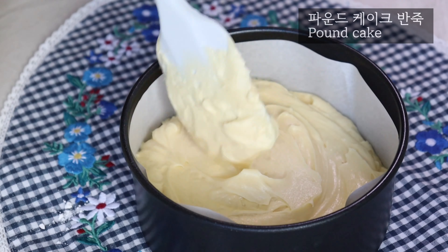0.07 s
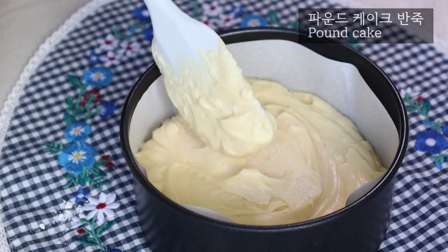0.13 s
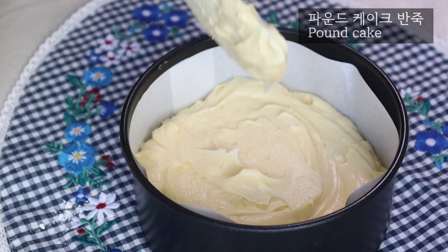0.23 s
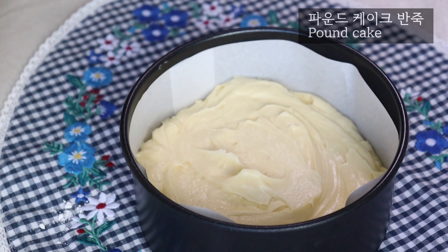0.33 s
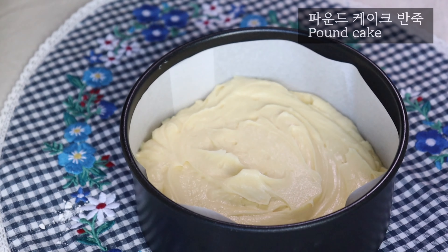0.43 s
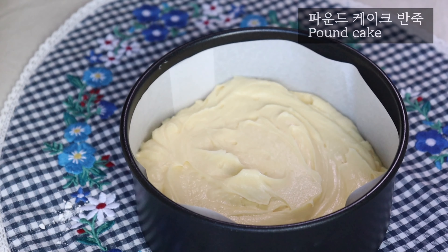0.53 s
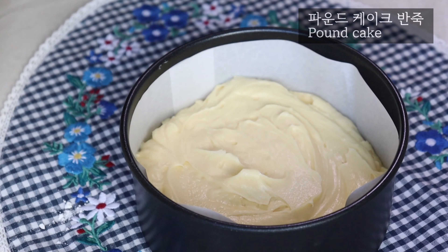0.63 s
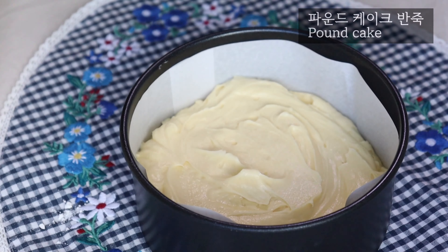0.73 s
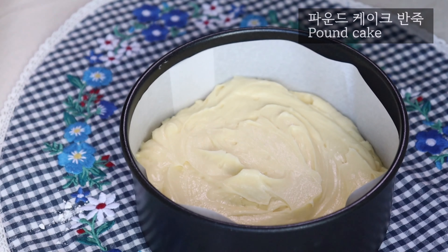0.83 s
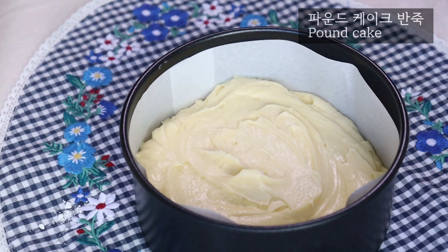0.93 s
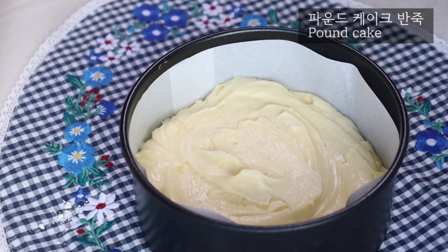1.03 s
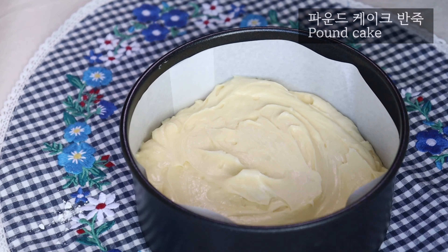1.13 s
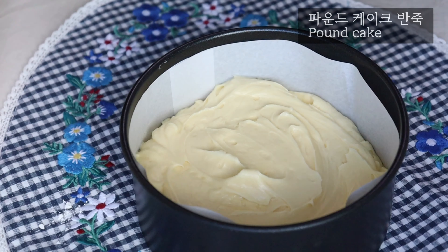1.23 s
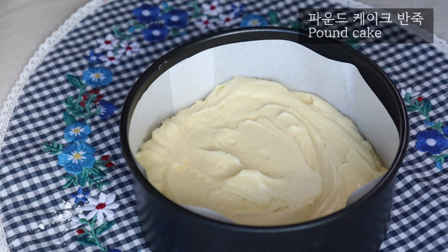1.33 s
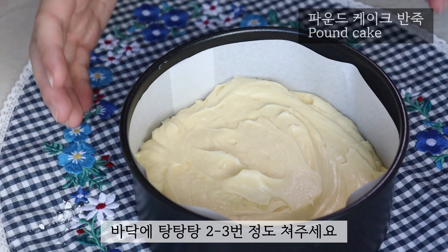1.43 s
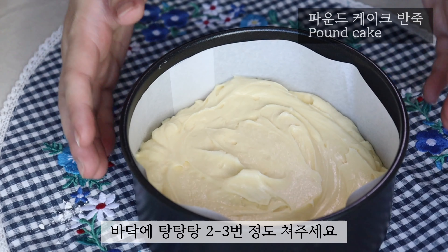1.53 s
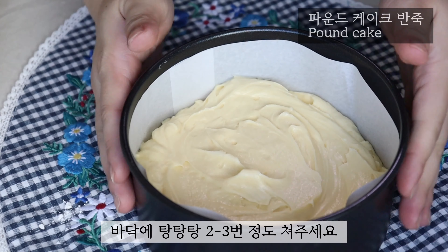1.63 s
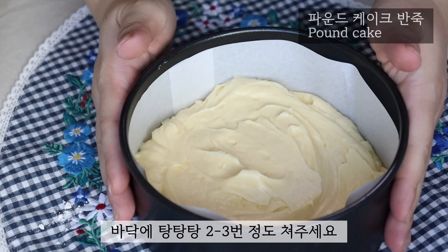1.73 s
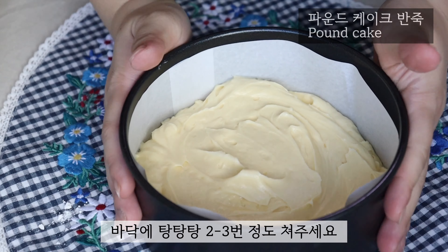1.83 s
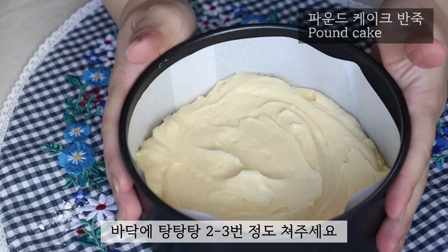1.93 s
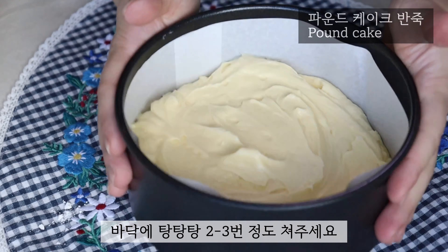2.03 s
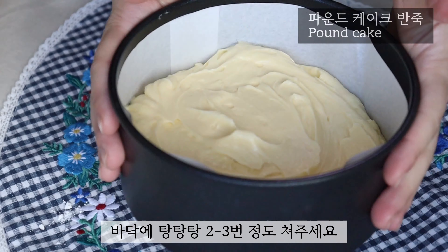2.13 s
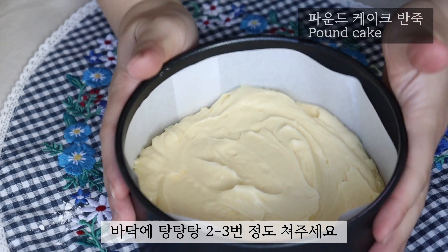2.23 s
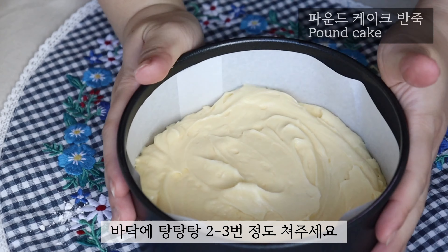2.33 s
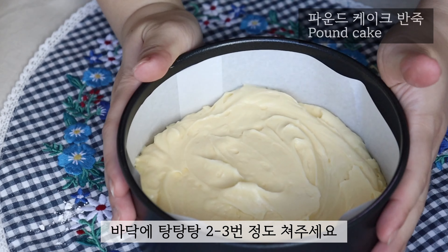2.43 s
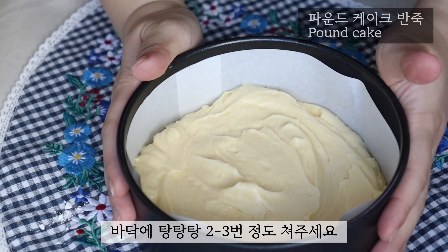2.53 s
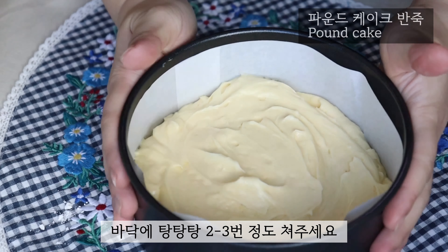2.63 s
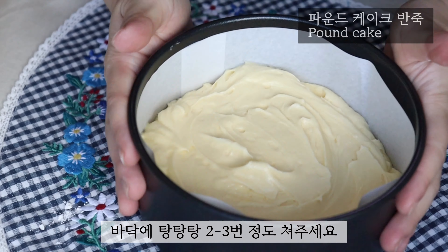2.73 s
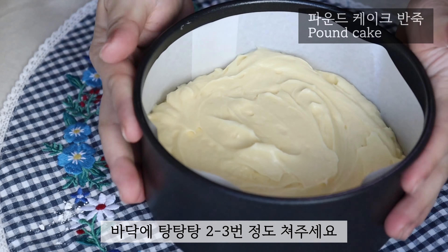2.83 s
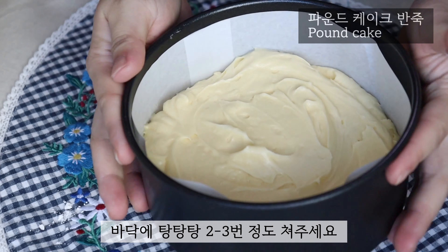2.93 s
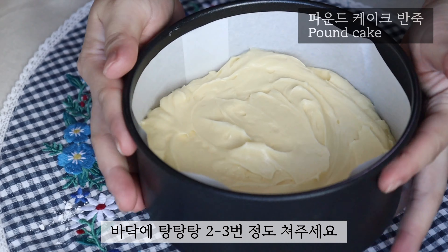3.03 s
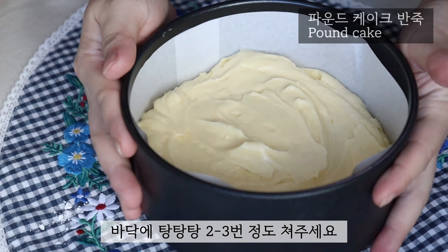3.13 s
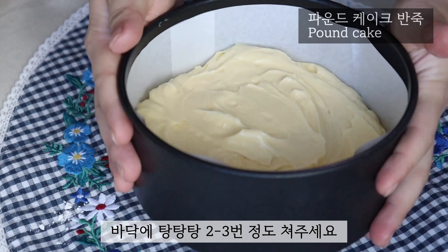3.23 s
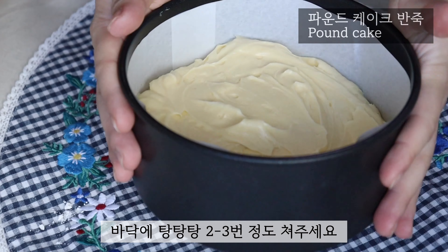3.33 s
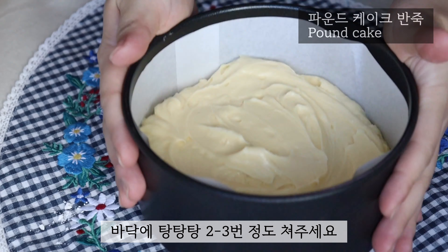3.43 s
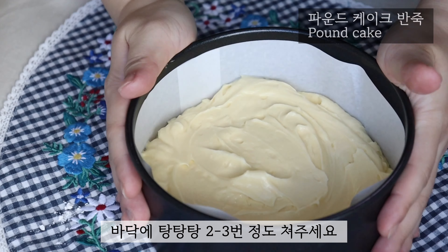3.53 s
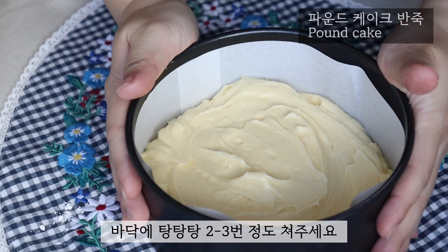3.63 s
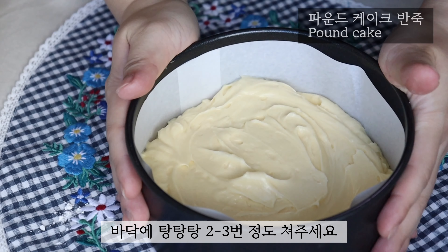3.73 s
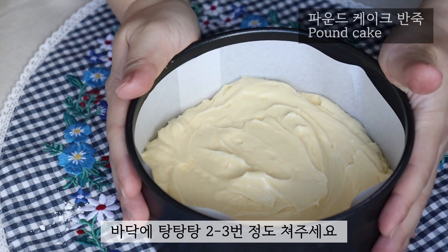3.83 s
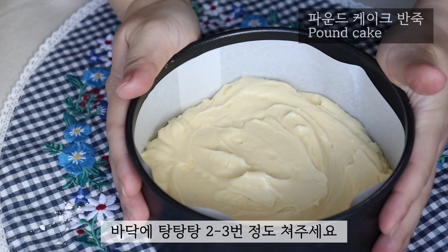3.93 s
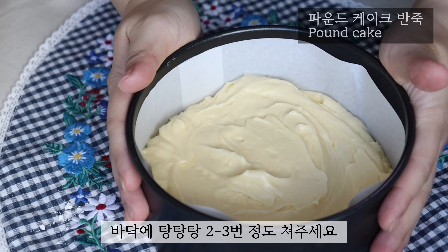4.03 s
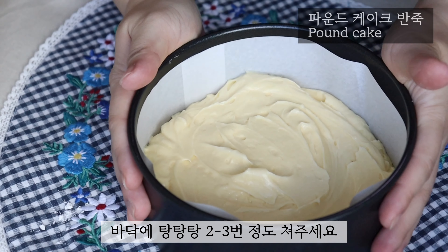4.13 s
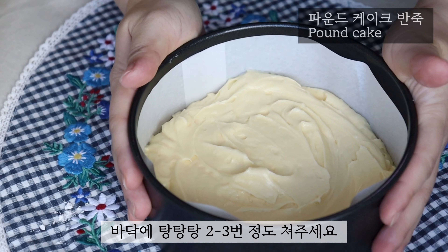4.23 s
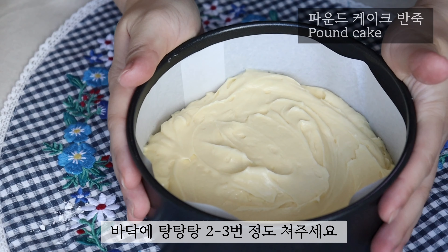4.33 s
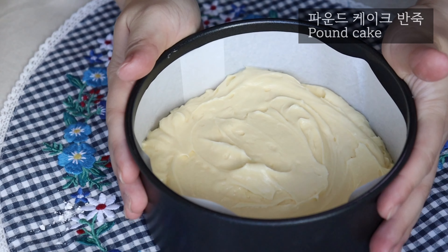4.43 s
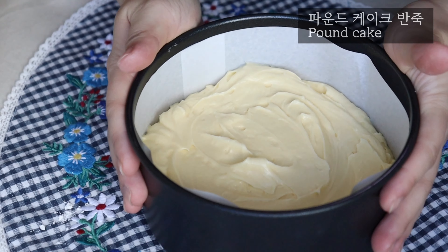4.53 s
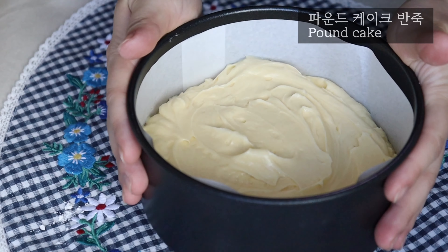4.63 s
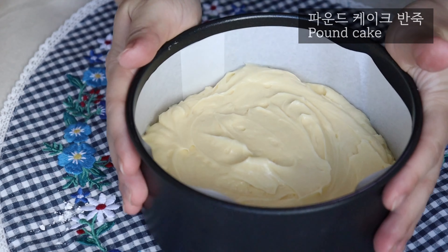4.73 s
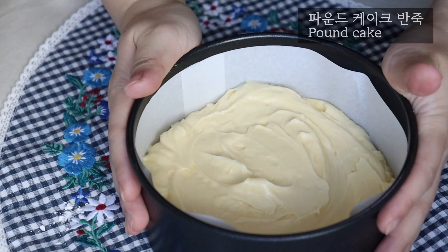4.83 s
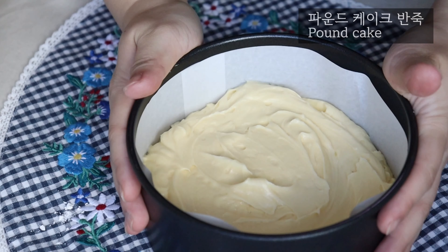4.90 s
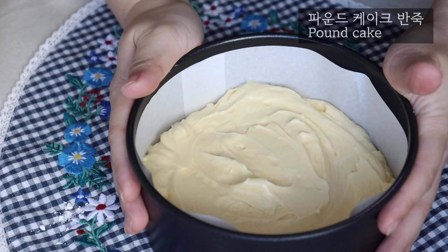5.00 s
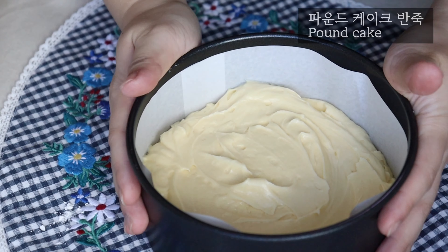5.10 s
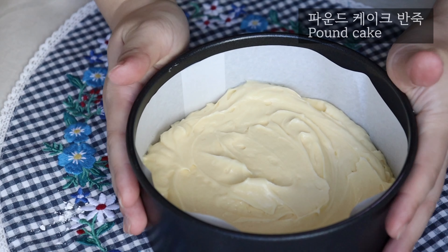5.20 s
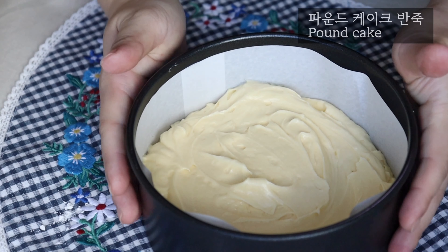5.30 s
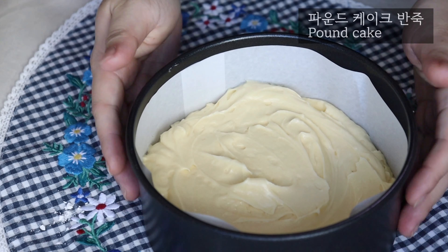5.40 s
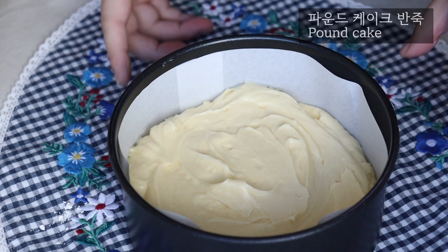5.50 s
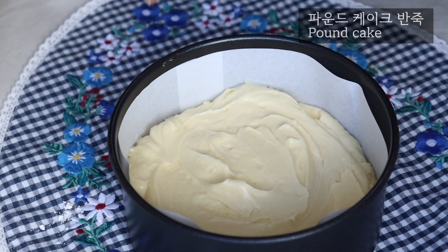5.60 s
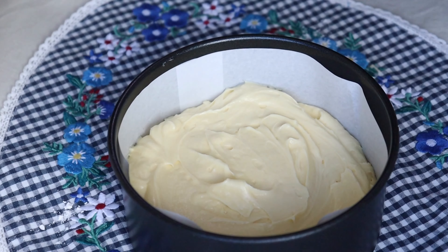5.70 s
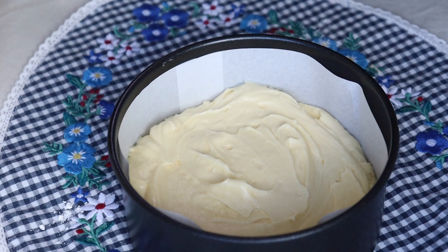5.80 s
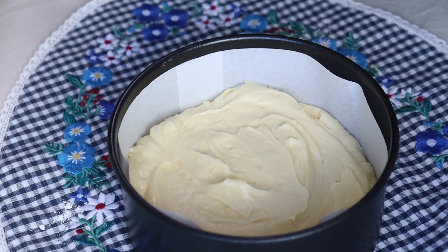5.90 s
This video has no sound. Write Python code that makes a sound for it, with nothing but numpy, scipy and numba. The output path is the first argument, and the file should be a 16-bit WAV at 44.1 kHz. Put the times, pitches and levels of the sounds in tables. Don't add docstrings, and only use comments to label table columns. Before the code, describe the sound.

Over a steady kitchen hum and faint insect chirps, three heavy pan thumps hit a table, rattling loose metal that chatters briefly.

```python
import sys
import numpy as np
from scipy import signal
from scipy.fft import rfft, irfft, next_fast_len
from scipy.io import wavfile
from scipy.ndimage import uniform_filter1d, map_coordinates
from numba import njit

SR = 44100
rng = np.random.default_rng(int(sys.argv[2]) if len(sys.argv) > 2 else 0)


def field_ratio(decibels):
    return 10 ** (np.asarray(decibels, dtype=float) / 20)


def master_out(mix):
    frames = np.transpose(np.atleast_2d(mix))
    ceiling = np.clip(frames, -1, 1)
    pcm = np.round(ceiling * 32767).astype(np.int16)
    wavfile.write(sys.argv[1], SR, pcm)


N = 262836

# frequency in Hz, level in dB, unsteady share from 0 to 1.
FRIDGE_LINES = [(28, -61, 0.1), (50.35, -36, 0.31), (57.4, -45.5, 0.6), (71, -57.5, 0.3), (123.5, -70.5, 1),
                (122, -49, 0), (220.8, -53, 0.91), (250, -56.5, 0.1), (365, -54.5, 0.92),
                (403, -58.5, 0.44)]
# frequency in Hz, density in dB per Hz.
AIR_SPECTRUM = [(15, -39), (25, -43), (63, -36), (97, -10), (170, -14.5), (229, -14.5), (293, -19),
                (363, -12), (575, -21), (1330, -25.5), (3250, -37.5), (7110, -42), (14800, -49.5),
                (16500, -47)]
# frequency in Hz, width in Hz, level in dB.
FAR_HISS = [(1293, 14, -63), (2110, 64, -67.5), (4940, 750, -66.5), (2805, 210, -68)]
# start in seconds, level in dB.
INSECT_STROKES = [(.9165, -47), (0.9257, -36.5), (0.9288, -36), (0.933, -45), (.937, -39), (.944, -40),
                  (.953, -42), (.9585, -42), (.9615, -38), (.989, -50), (1.36, -47), (1.4205, -46),
                  (1.424, -43), (1.428, -33.5), (1.434, -44), (1.442, -48), (1.4485, -44), (1.457, -44),
                  (5.655, -55)]
# start in seconds, level in dB, frequency in Hz.
SMALL_TICKS = [
    (1.4275, -50, 10000),
    (1.4485, -56, 9800),
    (1.4485, -49, 4000),
    (2.843, -47, 3100),
    (2.886, -46, 3040),
    (2.949, -48, 3100),
    (3.007, -54, 3100),
    (3.05, -53, 3200),
]
# centre in seconds, length in seconds, level in dB,
# frequency in Hz, lower band in dB.
BRUSHES = [(0.134, 0.11, -63, 11000, 15), (.6, .06, -70, 10000, 5), (1.36, .06, -63, 10000, 11),
           (1.752, .22, -57.5, 10000, 9), (1.986, 0.12, -63.5, 9500, 11), (2.675, .05, -63, 11000, -5),
           (2.838, 0.055, -61, 10400, -3), (2.93, .05, -61, 11500, -8), (2.977, 0.091, -58.5, 9800, -10),
           (3.114, 0.1, -58, 10500, -6), (3.225, 0.063, -59, 8600, 3), (3.262, 0.059, -56, 10500, 3),
           (3.386, 0.16, -57.5, 8300, 9), (5.375, 0.29, -65, 9500, 13), (5.757, 0.25, -68, 9000, 16),
           (5.892, 0.1, -64, 10000, 13), (1.949, .4, -58.5, 2200, 3), (5.621, 0.49, -62, 2800, 2),
           (5.851, 0.57, -57.5, 2000, 3)]
# frequency in Hz, level in dB, T60 in seconds.
RIM_MODES = [(3482, -9, .4), (3621, -5, .65), (4753, -12, .4), (5578, 1, .42), (7881, -6, .38)]
# frequency in Hz, level in dB, T60 in seconds.
RACK_MODES = [(921, -3, .3), (1147, 0, .22), (1865, -6, .35), (2823, 4, .2), (3260, -14, .65),
              (4353, -10, .66), (9470, -12, .22), (10140, -10, .2)]
# start in seconds, level in dB.
RIM_STRIKES = [
    (2.369, -31),
    (3.612, -29),
]
# start in seconds, level in dB.
RACK_STRIKES = [
    (3.612, -24),
]
# start in seconds, level in dB, tilt in dB per octave,
# knock on the table in dB.
METAL_LANDINGS = [(2.3178, -12.5, -4, -11), (2.362, -10.5, -3.5, -28), (2.367, -9, 1, -33),
                  (2.381, -10.5, -0.1, -21), (2.406, -16, -0.8, -8.5), (2.438, -18.5, 0.5, -9),
                  (2.46, -19.5, -1.5, -21), (2.484, -23, -2.2, -10.5), (2.532, -36.5, -2, -39),
                  (3.5594, -17, -2.5, -2), (3.605, -14, -1.5, 0.5), (3.6089, -5, 1, -27),
                  (3.623, -5.5, 2.5, -17), (3.632, -16, -3, -23), (3.645, -10, -0.2, -30),
                  (3.68, -17.5, -1, -11), (3.705, -21.5, 0, -15.5), (3.725, -23, -2.5, -35),
                  (3.77, -30, -3.5, -32), (3.997, -39.5, -2.5, -42), (4.854, -19, -3.5, -4.5),
                  (4.8965, -4, 1, -12), (4.902, -7.5, -0.5, -13), (4.914, -18.5, 6, -14.5),
                  (4.93, -17.5, -2, -12), (4.966, -21, 0, -37), (5.004, -45, -4, -37),
                  (5.088, -33, -7.5, -38)]
# frequency in Hz, level in dB, T60 in seconds.
METAL_MODES = [(1200, -11.5, 0.024), (1194, -11, 0.075), (1893, -17, 0.031), (1977, -9.5, 0.056),
               (2837, -9, 0.053), (3100, -24, 0.23), (3570, -9, 0.071), (4120, -17, 0.06),
               (4560, -16, 0.039), (5540, -9, 0.031), (5580, -7.5, 0.036), (7950, -18, 0.1),
               (9500, -15, 0.018), (10200, -14, .03)]
# frequency in Hz, density in dB per Hz.
CLATTER_SPECTRUM = [(180, -4), (300, -8), (1150, -1.5), (1480, -15), (1870, 0), (2400, -8.5), (2790, -5.5),
                    (5610, -5.5), (7320, -15), (10400, -8.5), (16000, -22)]
# start in seconds, level in dB, frequency in Hz, T60 in seconds.
METAL_PINGS = [(2.2995, -25, 4000, .03), (2.369, -19, 5610, .12), (2.369, -20, 1170, .05),
               (2.405, -23, 5600, .1), (2.438, -28, 10100, .04), (3.611, -20, 2823, .12),
               (3.612, -20, 5620, .08), (3.622, -18, 10200, .045), (3.622, -21, 8010, .06),
               (4.9, -17, 1190, .05), (4.9, -15, 1970, .05), (4.9, -16, 4190, .05), (4.9, -15, 4670, .055),
               (4.922, -22, 3570, .08)]
# start in seconds, level in dB, frequency in Hz, T60 in seconds.
FAVOURED_MODES = [
    (2.3, -23, 200, 0.23),
    (2.412, -22, 61, 0.67),
    (3.555, -20, 362, 0.13),
    (3.59, -13, 358, 0.17),
    (3.579, -15, 222.5, 0.39),
    (3.666, -21, 64.2, 0.58),
    (4.858, -13, 200, 0.24),
    (4.88, -22, 206.6, 0.38),
]
# start in seconds, level in dB, push in ms,
# deep modes in dB, direction (+1 down, -1 up).
PAN_BLOWS = [(2.2964, 2, 1.7, -24, 1), (2.2994, -6.2, 1.06, -14, -1), (2.304, -16, 6.9, -3, 1),
             (2.329, -19, 3.7, -10, 1), (3.5428, -16, 3, 19.5, 1), (3.5463, 2, 3.1, -3.5, -1),
             (3.5529, -1, 2.36, 1.5, 1), (3.5592, -6, 1.9, -12, -1), (3.59, -22, 2.9, -6, 1),
             (4.8353, -3, 5.6, 2.5, 1), (4.839, -2.2, 4, 1.5, -1), (4.845, -2.5, 3.4, -0.5, 1),
             (4.86, 0.5, 5.3, -10, 1), (4.883, -21, 3.4, -10, 1)]
# frequency in Hz, level in dB, T60 in seconds.
TABLE_MODES = [(58.23, -12.5, 0.82), (77.6, -6, 0.13), (101, -3, 0.056), (142.6, -11, 0.35),
               (200, -5.5, 0.23), (243.4, -0.5, 0.077), (294.3, -13, 0.31), (342.1, -14, 0.22),
               (397.6, -9.5, 0.072), (495, -5.5, 0.042), (600, -41, .06), (686, -54, .15)]
# frequency in Hz, density in dB per Hz.
SLAP_SPECTRUM = [(180, -6.5), (300, -3), (470, -11), (1030, -18), (1870, -21), (4830, -33.5),
                 (13500, -49.5), (16000, -61)]

AIR_DB = -43
FAST_UNTIL_S, FAST_RATIO = .922, 1.2
INSECT_HZ, INSECT_SCATTER, INSECT_TRAIL_S = 5110, .014, .03
BRUSH_WIDTH = .35
DRAG_FROM_S, DRAG_TO_S, DRAG_DB, DRAG_EDGE_S = 2.56, 2.8, -41, 0.036
CHATTER_RATE_HZ, MODE_SCATTER_DB = 2000, 5.5
CHATTER_LEAST_S, CHATTER_SHARE, CHATTER_MOST_S = 0.0039, 0.68, 0.026
METAL_RING_DB, RING_DB_PER_TILT = -13, 1
SMALL_MODES, SMALL_T60_S, SMALL_SHARE = 110, .045, .25
SLAP_DB, SLAP_DB_PER_MS = -6.5, -3.5
ROOM_T60_S, ROOM_DB, ROOM_DULL_HZ = 0.38, -12.5, 5030
MIC_LOW_HZ, MIC_TOP_HZ, MIC_HISS_DB = 32, 15800, -68.5
GAIN_TOP_DB, GAIN_POWER, GAIN_ATTACK_S, GAIN_RELEASE_S = -24, 0.063, 0.019, 0.26


def shaped(points, count):
    hz, db = np.transpose(points)
    f = np.fft.rfftfreq(count, 1 / SR) + 1
    colour = field_ratio(np.interp(np.log(f), np.log(hz), db))
    x = irfft(rfft(rng.standard_normal(count)) * colour, count)
    return x / np.std(x)


def band(hz, width_hz, count):
    f = np.fft.rfftfreq(count, 1 / SR)
    resonance = 1 / (1 + ((f - hz) / (width_hz / 2)) ** 2)
    x = irfft(rfft(rng.standard_normal(count)) * resonance, count)
    return x / np.std(x)


def rings(modes, length_s):
    t = np.arange(int(length_s * SR)) / SR
    return np.array([field_ratio(db - 60 * t / t60) * np.sin(2 * np.pi * hz * t) for hz, db, t60 in modes])


def add(out, s, x):
    i = int(s * SR)
    out[i:i + len(x)] += x[:len(out) - i]


def kitchen():
    count = next_fast_len(N + SR // 2)
    t = np.arange(count) / SR
    out = field_ratio(AIR_DB + .4 * band(0, 1.5, count)) * shaped(AIR_SPECTRUM, count)
    for hz, db, unsteady in FRIDGE_LINES:
        line = np.sqrt(2) * np.sin(2 * np.pi * (hz * t + rng.random()))
        out += field_ratio(db) * (line + unsteady * band(hz, 7.3, count))
    for hz, width_hz, db in FAR_HISS:
        out += field_ratio(db + 2.0 * band(0, 13, count)) * band(hz, width_hz, count)
    n = np.arange(N)
    place = np.where(n < FAST_UNTIL_S * SR, n * FAST_RATIO, n + SR // 2)
    return map_coordinates(out, [place], order=3)


def insect():
    out, t = np.zeros(N), np.arange(SR // 10) / SR
    pitch = INSECT_HZ * (1 + INSECT_SCATTER * rng.standard_normal(len(INSECT_STROKES)))
    chirps = [(s, db, hz) for (s, db), hz in zip(INSECT_STROKES, pitch)]
    for s, db, hz in chirps + SMALL_TICKS:
        swell = t / .0008 * np.exp(1 - t / .0008)
        stroke = swell * np.sin(2 * np.pi * hz * t)
        scrape = field_ratio(-17 - 30 * t / INSECT_TRAIL_S) * band(hz, 700, len(t))
        add(out, s, field_ratio(db + 3.0) * (stroke + scrape))
    return out


def hands():
    out, t = np.zeros(N), np.arange(N) / SR
    u = np.arange(SR // 2) / SR - .25
    for s, length_s, db, hz, low_db in BRUSHES:
        grit = field_ratio(2.5 * band(0, 150, len(u)))
        high = band(hz, BRUSH_WIDTH * hz, len(u))
        low = field_ratio(low_db - 9.5) * band(4800, 3600, len(u))
        brush = field_ratio(db) * np.exp(-8 * (u / length_s) ** 2) * grit * (high + low)
        before_start = int(max(.25 - s, 0) * SR)
        add(out, max(s - .25, 0), brush[before_start:])
    drag = np.clip(np.minimum(t - DRAG_FROM_S, DRAG_TO_S - t) / DRAG_EDGE_S, 0, 1)
    return out + field_ratio(DRAG_DB) * drag * band(338, 150, N)


def free_rings():
    out = np.zeros(N)
    for modes, strikes in (RIM_MODES, RIM_STRIKES), (RACK_MODES, RACK_STRIKES):
        for s, db in strikes:
            add(out, s, field_ratio(db) * rings(modes, .6).sum(axis=0))
    return out


def small_mode_response():
    modes = [(hz, 0, SMALL_T60_S) for hz in rng.uniform(900, 17000, SMALL_MODES)]
    small = rings(modes, SMALL_T60_S).sum(axis=0)
    return small / np.sqrt(np.sum(small ** 2))


def metalware():
    out, modes = np.zeros(N), np.array(METAL_MODES)
    ring, table, t = rings(modes, .2), rings(TABLE_MODES, 0.47), np.arange(SR // 6) / SR
    wood = field_ratio(3.3 * np.log2(np.array(TABLE_MODES)[:, 0] / 200)) @ table
    gaps = np.diff(np.array(METAL_LANDINGS)[:, 0], append=N / SR)
    chatter = np.minimum(CHATTER_LEAST_S + CHATTER_SHARE * gaps, CHATTER_MOST_S)
    for (s, db, tilt_db, knock_db), chatter_s in zip(METAL_LANDINGS, chatter):
        fade = np.exp(-t / chatter_s) * np.clip(t / 0.00064, 0, 1)
        hits = (rng.random(len(t)) < CHATTER_RATE_HZ / SR) * rng.standard_normal(len(t))
        run = hits * fade / np.sqrt(np.sum((hits * fade) ** 2) + 1e-9)
        scatter_db = MODE_SCATTER_DB * rng.standard_normal(len(modes))
        mix = field_ratio(tilt_db * np.log2(modes[:, 0] / 4000) + scatter_db)
        ring_db = db + METAL_RING_DB + RING_DB_PER_TILT * min(tilt_db, 0)
        add(out, s, field_ratio(ring_db) * signal.fftconvolve(mix @ ring, run))
        colour = [(hz, d + tilt_db * np.log2(hz / 4000)) for hz, d in CLATTER_SPECTRUM]
        grain = uniform_filter1d(np.abs(hits), size=50)
        clatter = fade * (0.53 + 0.3 * grain / grain.mean()) * shaped(colour, len(t))
        banded = signal.fftconvolve(clatter, small_mode_response())[:len(t)]
        clatter = np.sqrt(1 - SMALL_SHARE) * clatter + np.sqrt(SMALL_SHARE) * banded
        add(out, s, field_ratio(db - 5.5) * clatter)
        add(out, s, field_ratio(knock_db - 14) * signal.fftconvolve(wood, run))
    return out


def single_modes():
    out = np.zeros(N)
    for s, db, hz, t60 in METAL_PINGS + FAVOURED_MODES:
        add(out, s, rings([(hz, db, t60)], 0.51)[0])
    return out


def thumps():
    out, table = np.zeros(N), rings(TABLE_MODES, 0.89)
    deep = np.array(TABLE_MODES)[:, 0] < 125
    t = np.arange(SR // 8) / SR
    for s, db, push_ms, deep_db, direction in PAN_BLOWS:
        push = np.sin(np.pi * np.clip(t[:800] * 1000 / push_ms, 0, 1)) ** 2
        ring = signal.fftconvolve(field_ratio(deep * deep_db) @ table, push / push.sum())
        add(out, s, np.sign(direction) * field_ratio(db - 7.0) * ring)
        slap_db = SLAP_DB + SLAP_DB_PER_MS * push_ms
        slap_fade = field_ratio(slap_db - 60 * t / 0.1) * np.clip(t / 0.0044, 0, 1)
        add(out, s, slap_fade * shaped(SLAP_SPECTRUM, len(t)))
    return out


def room(x):
    t = np.arange(int(.6 * SR)) / SR
    noise = rng.standard_normal(len(t))
    low = signal.sosfilt(signal.butter(1, ROOM_DULL_HZ, fs=SR, output="sos"), noise)
    tail = low * field_ratio(-60 * t / ROOM_T60_S) + (noise - low) * field_ratio(-110 * t / ROOM_T60_S)
    tail *= np.clip(t / 0.0037, 0, 1)
    return x + field_ratio(ROOM_DB) * signal.fftconvolve(x, tail / np.sqrt(np.sum(tail ** 2)))[:N]


def scene():
    in_room = room(thumps() + metalware() + single_modes() + insect())
    return (in_room + free_rings() + hands() + kitchen())[None]


@njit
def follow(x, attack, release):
    e, out = 0., np.empty(len(x))
    for i in range(len(x)):
        e += (abs(x[i]) - e) * (attack if abs(x[i]) > e else release)
        out[i] = e
    return out


def band_limit(x):
    return signal.sosfilt(signal.butter(12, 16370, fs=SR, output="sos"), x)


def record(dry):
    dry = signal.sosfilt(signal.butter(2, MIC_LOW_HZ, "high", fs=SR, output="sos"), dry)
    heard = follow(dry[0], 1 / (GAIN_ATTACK_S * SR), 1 / (GAIN_RELEASE_S * SR))
    gain = np.minimum(field_ratio(GAIN_TOP_DB) / (heard + 1e-9), 1) ** GAIN_POWER
    hiss = field_ratio(MIC_HISS_DB) * band(13800, 8400, N)
    clipped = np.clip(dry * gain + hiss, -1, 1)
    top_cut = signal.ellip(10, .2, 70, MIC_TOP_HZ, fs=SR, output="sos")
    return band_limit(signal.sosfilt(top_cut, clipped))


dry = scene()
out = record(dry)
master_out(out)
```